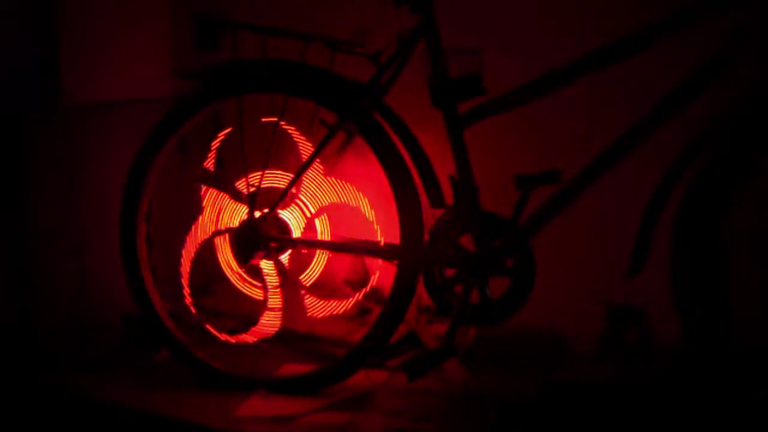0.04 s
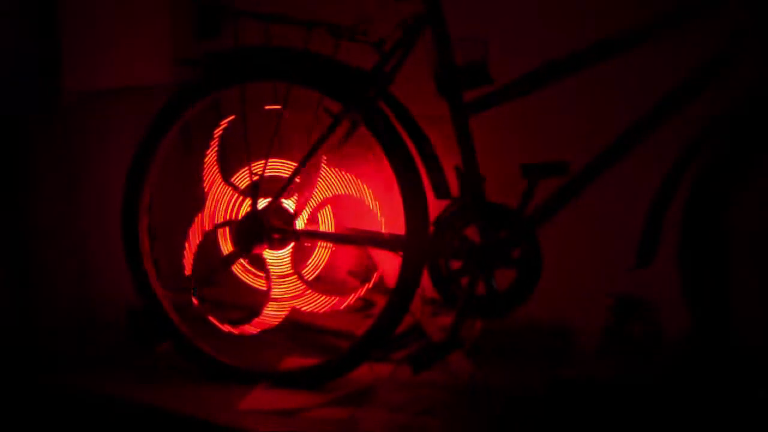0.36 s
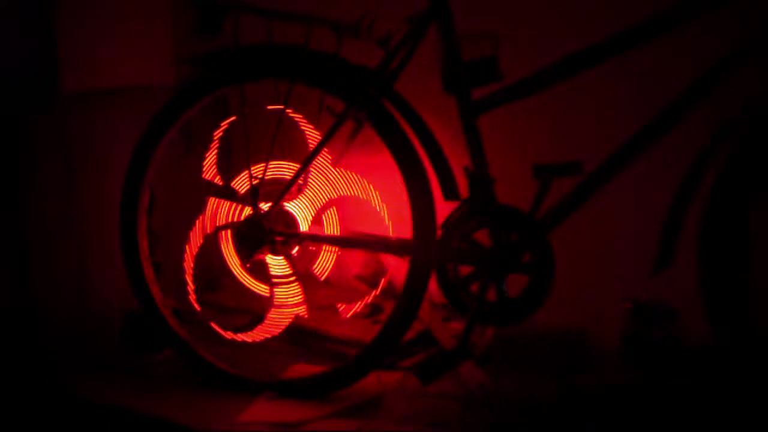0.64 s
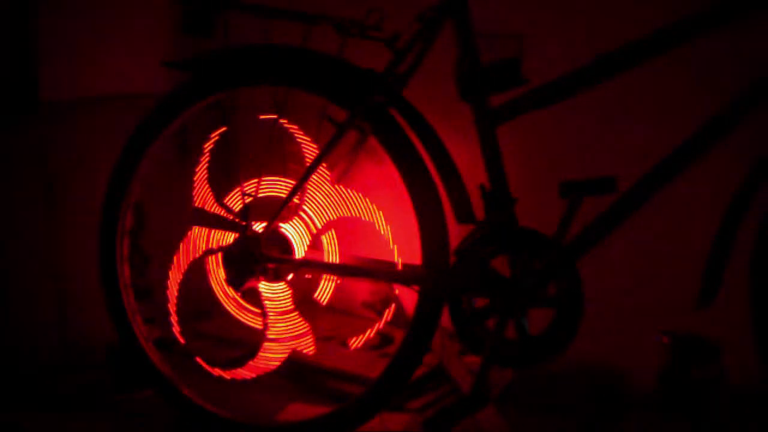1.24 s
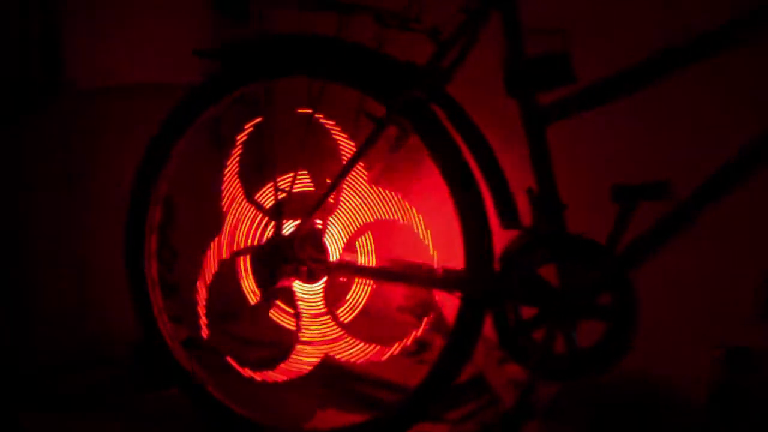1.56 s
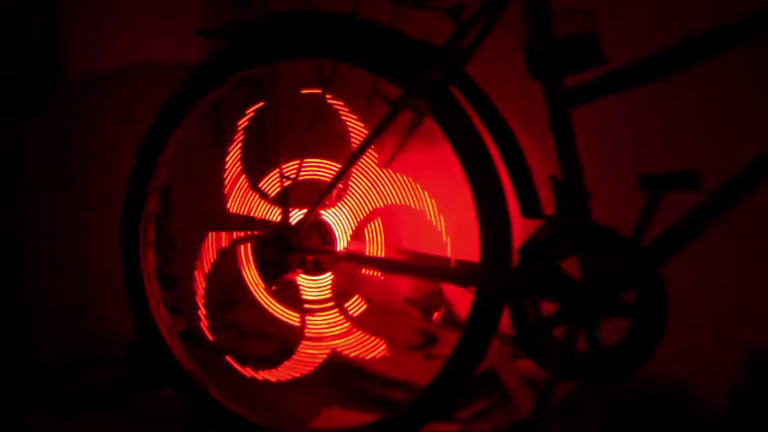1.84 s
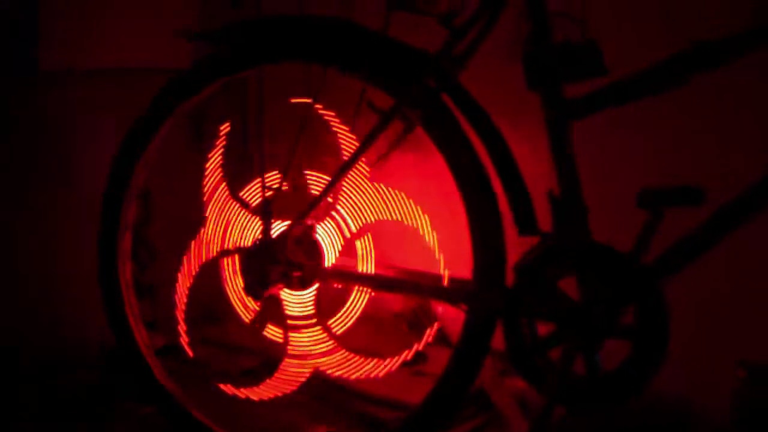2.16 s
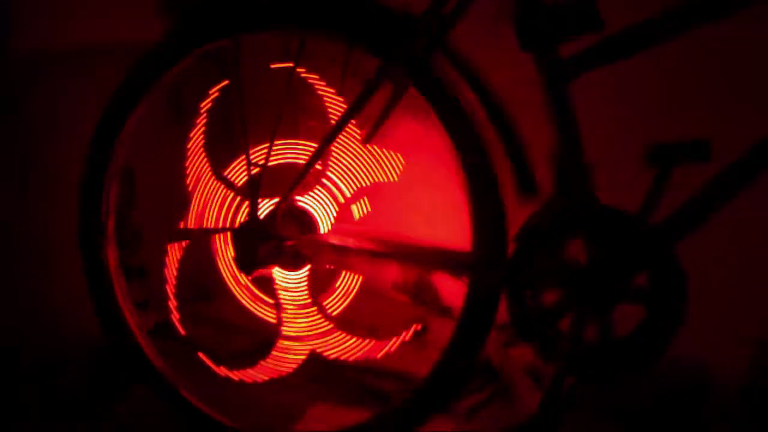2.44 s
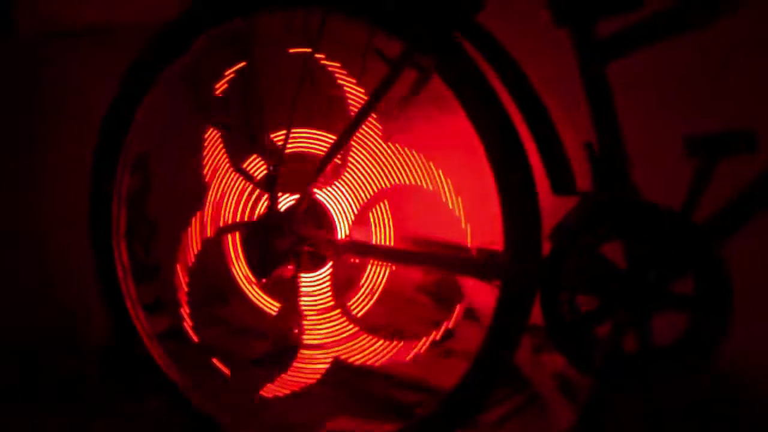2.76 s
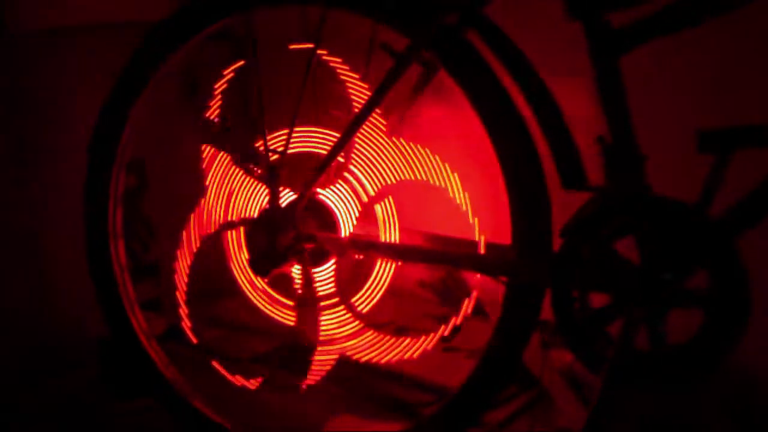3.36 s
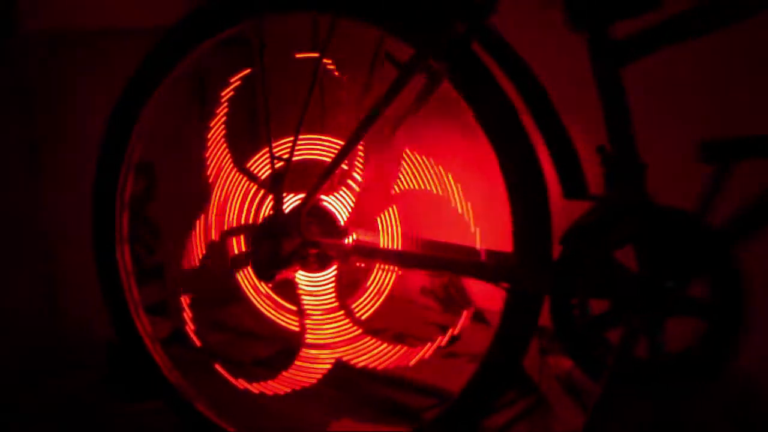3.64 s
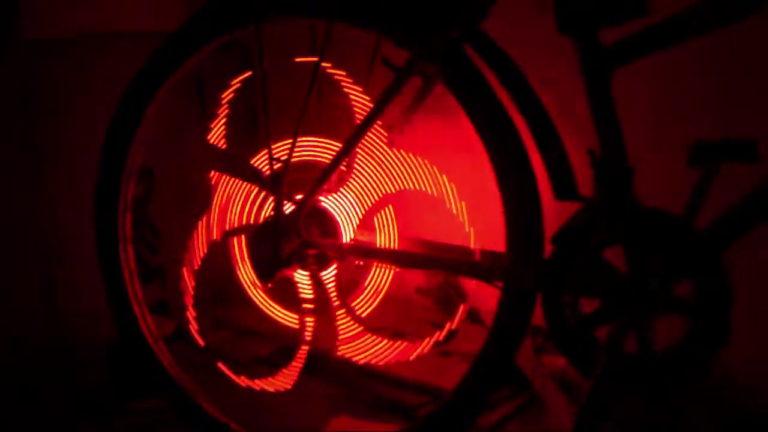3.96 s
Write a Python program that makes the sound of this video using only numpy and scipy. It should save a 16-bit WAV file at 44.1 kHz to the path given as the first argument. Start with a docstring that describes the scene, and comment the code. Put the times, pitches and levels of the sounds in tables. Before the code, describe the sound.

A bicycle wheel spins fast and steadily in a room, making a fluttering whir and a throbbing whine. The whine's tones swell and fade as the microphone creeps closer, over soft hiss, faint hum and a low rumble.

```python
"""Indoors, a bicycle wheel is kept spinning at nine turns a second, probably by a small motor.
The drive pulses unevenly, ten times a turn, and whines; the roughness of the running surfaces
repeats with every turn as a fluttering whir. The microphone creeps closer through the room's
standing waves, so tones swell and fade, over hiss, hum and a low rumble."""
import sys
import numpy as np
from scipy import signal
from scipy.fft import rfft, irfft
from scipy.io import wavfile
from scipy.ndimage import uniform_filter1d

SR = 44100
rng = np.random.default_rng(int(sys.argv[2]) if len(sys.argv) > 2 else 0)


def unload_audio(sound):
    """Save the sound as a 16-bit wav file, at the path given as the first command line argument."""
    columns = np.transpose(np.atleast_2d(sound))
    # keep every value between -1 and 1, then stretch to whole-number steps
    steps = np.round(np.clip(columns, -1, 1) * 32767)
    wavfile.write(sys.argv[1], SR, steps.astype(np.int16))


N = 176400
TIME = np.arange(N) / SR
TURNS_PER_S, PULSES_PER_TURN = 9.06, 10
POSITION_S = (.45, 1.4, 2.35, 3.45)  # the microphone passes four positions, far to near
MAIN_ORDERS = (90, 100, 130)  # the three strongest whine tones [cycles per turn]
# weaker whine tones: (order, rounded in use [cycles per turn], level at each of the four positions [dB])
WEAK_TONES = [(17, -73, -71, -66, -59), (28, -67.5, -68, -67, -65), (37, -78, -71.5, -64.5, -61.5),
              (44, -74, -62.5, -65.5, -62), (60, -71, -63.5, -66, -62.5),
              (69.925, -61, -58.5, -57.5, -56.5), (84, -55.5, -62.5, -54.5, -58.5),
              (93.09, -72, -50.5, -50.5, -50), (96.93, -57.5, -55.5, -50.5, -56),
              (101, -52, -60.5, -51.5, -52.5), (102, -59, -50.5, -52, -51),
              (103.06, -55.5, -48.5, -49.5, -48), (110.35, -60, -53.5, -51.5, -53),
              (119.86, -48, -57.5, -56, -66), (122, -63.5, -60.5, -55.5, -53.5),
              (122.9, -60, -61.5, -57, -55), (132.75, -58.5, -56, -55.5, -55),
              (139.58, -51.5, -53.5, -54.5, -54), (180, -60.5, -56.5, -63.5, -62.5),
              (188, -61, -60.5, -58, -54.5), (215.13, -71, -69.5, -66, -59.5),
              (221, -60.5, -62.5, -73, -73), (226.86, -68.5, -61, -59, -74), (239.65, -77, -74, -62, -77),
              (258.7, -74, -70, -76.5, -63.5), (270, -62.5, -66, -63, -56.5), (281, -71, -70, -77, -74.5),
              (316.1, -69.5, -68, -69.5, -77.5), (451, -72, -74, -73.5, -69)]


def from_db(db):
    """Decibels to gain."""
    return 10 ** (np.asarray(db) / 20)


def fader(points):
    """Gain that rides through (time [s], level [dB]) points."""
    return from_db(np.interp(TIME, *np.transpose(points)))


def at_hz(points, hz):
    """Read a spectrum on a log-frequency axis."""
    frequencies, db = np.transpose(points)
    return np.interp(np.log(np.maximum(hz, 1)), np.log(frequencies), db)


def drift(rate_hz):
    """Smooth random wander with a spread of about 1."""
    hz = np.arange(2001) / 40  # 40 s of control signal, 100 points a second
    slow = irfft(rfft(rng.standard_normal(4000)) / (1 + (hz / rate_hz) ** 4))
    return np.interp(TIME * 100, np.arange(len(slow)), slow / slow.std())


def noise(spectrum):
    """Noise coloured by a spectrum, with nothing below 6 Hz."""
    hz = np.arange(N // 2 + 1) * SR / N
    coloured = rfft(rng.standard_normal(N)) * from_db(at_hz(spectrum, hz))
    return irfft(coloured * (hz > 6), N) * np.sqrt(SR / 2)


def levelled(x, window):
    """Compress a sound by its envelope, smoothed over a window of samples; rms 1."""
    envelope = uniform_filter1d(abs(signal.hilbert(x)), size=window)
    x = x / envelope ** .9
    return x / x.std()


def drive_phases(orders, level_db, size=512, swing_db=2.2, loose_rad=.4):
    """Phases that make the tones throb together like the uneven drive pulses."""
    # the ten drive pulses of a turn: (strength [dB])
    pulse_db = (0, -.5, -4, -2.5, 2, -2.5, -2, 1, -4.5, -5.5)
    pulse = (np.arange(size) / size - .043) * PULSES_PER_TURN  # the first lands .043 turns in
    accent_db = np.interp(pulse, np.arange(PULSES_PER_TURN), pulse_db, period=PULSES_PER_TURN)
    throb = from_db(accent_db + swing_db * np.cos(2 * np.pi * pulse))
    phase = 2 * np.pi * rng.random(len(orders))
    spectrum = np.zeros(size, complex)
    for _ in range(60):  # impose the tone levels and the throb envelope by turns
        spectrum[orders] = from_db(level_db) * np.exp(1j * phase)
        wave = throb * np.exp(1j * np.angle(np.fft.ifft(spectrum)))
        phase = np.angle(np.fft.fft(wave)[orders])
    is_sideband = orders % PULSES_PER_TURN > 0
    return phase + loose_rad * is_sideband * rng.standard_normal(len(orders))


def whine(turn, in_step_s=2.6, slip_rad_per_s=.45, scatter_db=2.5):
    """Harmonics of the drive pulses and the sidebands their unevenness adds, following the wheel."""
    # main tones as the microphone moves: (time [s], level of each of the three main orders [dB])
    main_levels = [(0.06, -46.5, -46, -53), (0.5, -43, -43, -64.5), (0.831, -44, -48, -46.5),
                   (1.16, -46.5, -44.5, -45.5), (1.492, -41.5, -48.5, -51), (1.821, -42, -69, -41),
                   (2.15, -46, -42.5, -54), (2.37, -42.5, -44, -52), (2.59, -41, -41, -42.5),
                   (3.04, -47, -47, -45), (3.481, -47.5, -60.5, -44), (3.92, -44, -44, -45.5)]
    # main resonance, filled with faint sidebands: (frequency [Hz], relative level [dB])
    resonance = [(740, -60.5), (800, -63), (920, -62), (1000, -63), (1200, -63), (1300, -66)]
    position_db = np.array((-7, -7, 0, -2))
    curves = {}
    for order in range(82, 145):
        db = at_hz(resonance, order * TURNS_PER_S) + position_db
        curves[order] = (POSITION_S, db + scatter_db * rng.standard_normal(len(POSITION_S)))
    curves.update({round(order): (POSITION_S, db) for order, *db in WEAK_TONES})
    times, *levels = np.transpose(main_levels)
    curves.update({order: (times, db) for order, db in zip(MAIN_ORDERS, levels)})
    orders = np.array(list(curves))
    phases = drive_phases(orders, [np.interp(in_step_s, *curve) for curve in curves.values()])
    tones = 0
    for order, phase, (times, db) in zip(orders, phases, curves.values()):
        # the throb is clearest at in_step_s; the weaker tones slip apart before and after
        slip = 0 if order in MAIN_ORDERS else slip_rad_per_s * rng.standard_normal()
        angle = 2 * np.pi * order * turn + phase + slip * (TIME - in_step_s)
        tones = tones + np.interp(TIME, times, from_db(db)) * np.sin(angle)
    return np.sqrt(2) * tones


def contact(turn, catch_at=.015, slack_turns=.04, slack_db=4.0):
    """Gain of the contact, which slackens late in each turn and then catches abruptly."""
    to_catch = (catch_at - turn) % 1
    gain = from_db(-slack_db * np.exp(-to_catch / slack_turns))
    gain = uniform_filter1d(gain, int(.001 * SR))
    return gain / np.sqrt(np.mean(gain ** 2))


def rough_surface(turn, spectrum, size=8192):
    """A random surface profile, one turn long and looped, with gaps for the main and weaker tones."""
    hz = np.arange(size // 2 + 1) * TURNS_PER_S
    harmonics = from_db(at_hz(spectrum, hz)) * (hz > spectrum[0][0]) * (hz < spectrum[-1][0])
    harmonics[[*MAIN_ORDERS, *(round(row[0]) for row in WEAK_TONES)]] = 0
    strength = rng.rayleigh(1, len(hz))
    strength /= np.sqrt(np.mean(strength ** 2))
    phasors = np.exp(2j * np.pi * rng.random(len(hz)))
    profile = irfft(harmonics * strength * phasors) * size * np.sqrt(TURNS_PER_S / 2)
    return np.interp(turn % 1, np.arange(size) / size, profile, period=1)


def whir(turn, room_share=.4, wobble_db=1.0, drive_db=.5):
    """The running surfaces: steady direct sound plus reflections that shift as the microphone moves."""
    # colours of the running noise: (frequency [Hz], relative density [dB per Hz])
    running_band = [(120, -82.5), (155, -78), (200, -86), (270, -80.5), (320, -84.5), (385, -81),
                    (480, -85), (600, -77.5), (690, -79), (745, -75), (850, -77), (1050, -74.5),
                    (1280, -78.5), (1390, -94.5), (1550, -85), (1680, -75), (1900, -83), (2300, -88.5),
                    (2500, -84.5), (2700, -93.5), (2900, -93.5), (3300, -99), (3850, -95), (4070, -93),
                    (4600, -107), (6000, -102.5), (6500, -105), (7100, -101), (7900, -120)]
    ring_band = [(1940, -105), (2020, -82.5), (2090, -80), (2200, -108)]  # a narrow band that rings out for a while
    metal_band = [(2780, -115), (2890, -92), (2990, -115)]  # faint high ring of the metal
    sheen_band = [(5300, -112), (5900, -102), (6600, -112)]  # comes up as the microphone nears
    # fader rides of the three narrow bands: (time [s], level [dB])
    ring_ride = [(0, -8.5), (0.999, -2), (2.2, -1), (2.801, -15.5)]
    metal_ride = [(0, -12), (1.5, 2.5), (2.6, -12)]
    sheen_ride = [(1.3, -12), (1.9, 0.5)]
    # the low end rolls with each turn: (angle [turns], level [dB])
    body_roll = [(.05, -1), (.22, -2), (.47, -8), (.66, 4), (.85, 5.5)]
    # crossfade points, each with a new pattern of reflections: (time [s])
    room_times = (0, 0.801, 1.3, 1.8, 2.299, 2.898, 3.999)
    fades = [np.sin(np.pi / 2 * np.interp(TIME, room_times, row)) for row in np.eye(len(room_times))]
    reflected = sum(fade * rough_surface(turn, running_band) for fade in fades)
    direct = rough_surface(turn, running_band)
    running = np.sqrt(1 - room_share) * direct + np.sqrt(room_share) * reflected
    body = signal.sosfiltfilt(signal.butter(2, 440, fs=SR, output="sos"), running)
    body_db = np.interp(TIME, POSITION_S, (-4, -.5, -1, -1.5))
    body_db += np.interp(turn, *np.transpose(body_roll), period=1)
    running = running - body + body.std() * levelled(body, window=700) * from_db(body_db)
    for band, ride in ((ring_band, ring_ride), (metal_band, metal_ride), (sheen_band, sheen_ride)):
        running = running + rough_surface(turn, band) * fader(ride)
    # three wobbles a turn and the drive pulses swing the level
    angle = 2 * np.pi * (turn - .45)
    swing_db = wobble_db * np.cos(3 * angle) + drive_db * np.cos(PULSES_PER_TURN * angle)
    position_db = np.interp(TIME, POSITION_S, (.049, .03, .53, .8))
    return running * from_db(position_db + swing_db)


def hiss(trim_db=-1, rise_db_per_s=.57):
    """Hiss of air, contact and room, slowly rising."""
    # broad noise bed: (frequency [Hz], relative density [dB per Hz])
    hiss_band = [(70, -73), (140, -74), (200, -86), (300, -81.5), (500, -85.5), (1000, -80.5), (2000, -88),
                 (3200, -97.5), (4050, -102), (4700, -104.5), (7100, -105), (7500, -107), (7900, -117)]
    return noise(hiss_band) * from_db(trim_db + rise_db_per_s * (TIME - TIME.mean()))


def sizzle(flicker_db=3):
    """Thin, flickering sizzle of the contact."""
    # narrow treble peak: (frequency [Hz], density [dB per Hz])
    sizzle_band = [(6300, -125), (7050, -102), (7700, -125)]
    return noise(sizzle_band) * from_db(flicker_db * drift(rate_hz=21))


def treble_flutter(x, turn, peak_at=.27, depth_db=1.5):
    """The treble swells and sinks with each turn."""
    treble = signal.sosfiltfilt(signal.butter(2, 1500, "high", fs=SR, output="sos"), x)
    gain = from_db(depth_db * np.cos(2 * np.pi * (turn - peak_at)))
    return x + treble * (gain - 1)


def ring_dip(x, turn, dip_at=.8, width_turns=.09, depth_db=5):
    """The upper ringing ducks briefly, late in each turn."""
    ringing = signal.sosfiltfilt(signal.butter(2, (1500, 2400), "band", fs=SR, output="sos"), x)
    from_dip = (turn - dip_at + .5) % 1 - .5
    gain = from_db(-depth_db * np.exp(-(from_dip / width_turns) ** 2))
    return x + ringing * (gain / gain.mean() - 1)


def hum():
    """Low tones in the room, slowly fading."""
    # room hum: (frequency [Hz], start level [dB], end level [dB])
    hum_tones = [(99.7, -60.5, -71), (106.8, -57, -67.5), (202.6, -66.5, -67.5), (255.8, -65.5, -76.5)]
    tones = 0
    for hz, start_db, end_db in hum_tones:
        gain = from_db(np.linspace(start_db, end_db, N))
        tones = tones + gain * np.sin(2 * np.pi * (hz * TIME + rng.random()))
    return np.sqrt(2) * tones


def rumble():
    """A throbbing low rumble at the microphone."""
    # colour of the rumble: (frequency [Hz], relative level [dB])
    rumble_band = [(16, -30.5), (27, -8.5), (37, 4), (48, -18.5), (70, -31), (140, -73.5)]
    # its surges: (time [s], level [dB])
    surges = [(0.2, -59), (.31, -43), (.4, -56), (.58, -58), (.7, -51), (.78, -59), (.87, -50), (.95, -58),
              (1.04, -50), (1.3, -57), (1.75, -56), (1.95, -44), (2.2, -46), (2.45, -54), (2.78, -54),
              (2.88, -46), (3.05, -53), (3.3, -46), (3.5, -57), (3.68, -41), (3.85, -43), (4.0, -51)]
    return levelled(noise(rumble_band), window=4000) * fader(surges)


def air_sway():
    """Air sways against the microphone in sub-bass gusts."""
    # colour of the moving air: (frequency [Hz], relative level [dB])
    sway_band = [(7, -54), (13, -46), (18, -45.5), (26, -74), (50, -110)]
    # its gusts: (time [s], level [dB])
    gusts = [(.15, -52), (.31, -39), (.52, -48), (.87, -40), (1.25, -46), (2.7, -47), (2.88, -37),
             (3.05, -43), (3.27, -39), (3.5, -50)]
    return levelled(noise(sway_band), window=4000) * fader(gusts)


def scene():
    """The wheel's angle drives whine, whir and the flutter of the hiss, over the room's low end."""
    speed = TURNS_PER_S * (1 + .000506 * drift(rate_hz=.619))
    turn = np.cumsum(speed) / SR
    noise_bed = hiss() + sizzle()
    drive = contact(turn) * whine(turn)
    wheel = drive + treble_flutter(whir(turn) + noise_bed, turn)
    return (ring_dip(wheel, turn) + hum() + rumble() + air_sway())[None]


def record(dry):
    """A steep low-pass takes off the top above 7.9 kHz."""
    return signal.sosfilt(signal.ellip(12, .1, 80, 7900, fs=SR, output="sos"), dry)


dry = scene()
out = record(dry)
unload_audio(out)
```